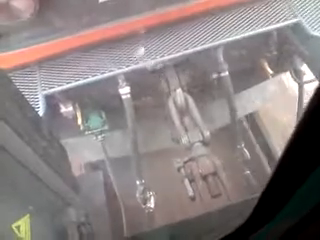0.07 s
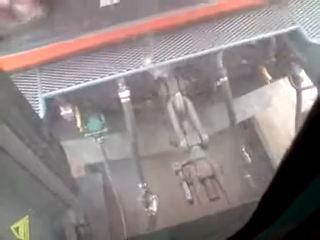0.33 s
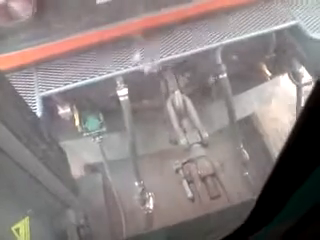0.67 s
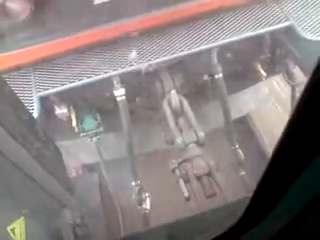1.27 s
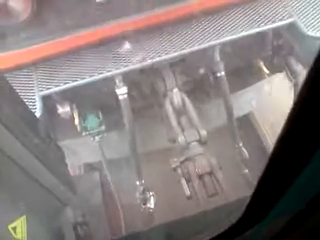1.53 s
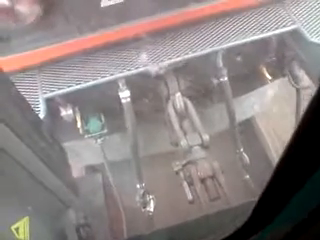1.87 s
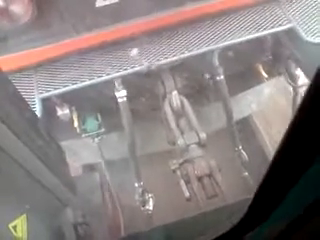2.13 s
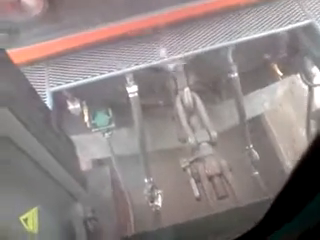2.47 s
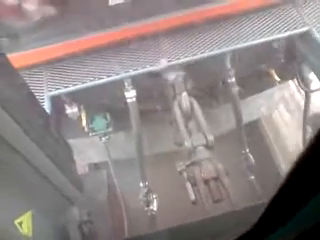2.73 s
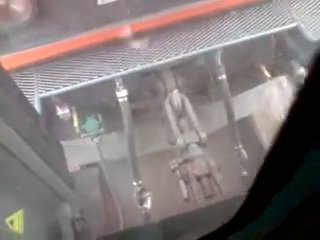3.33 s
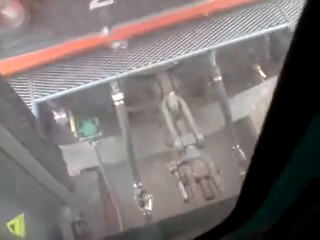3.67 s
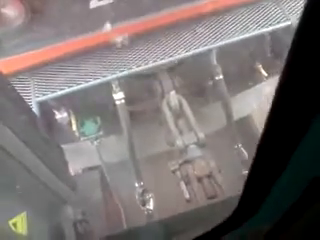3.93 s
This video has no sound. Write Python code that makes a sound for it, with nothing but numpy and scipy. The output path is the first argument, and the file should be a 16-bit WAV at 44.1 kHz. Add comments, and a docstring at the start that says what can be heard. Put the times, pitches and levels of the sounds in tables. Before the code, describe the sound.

Steady low rumble of a rolling train, with booming knocks and clinking steel fittings.

```python
"""A rolling train, heard inside the end of a carriage, above the coupling.
Wheels shake the hollow body and roar on the rails; panels drone and moan. Wheel and coupling
knocks make the body boom and loose steel fittings clatter. The coupling scrapes now and then.
The recorder is dull and clips the heaviest booms."""
import sys
import numpy as np
from scipy import signal
from scipy.fft import rfft, irfft
from scipy.io import wavfile
from scipy.ndimage import uniform_filter1d

SR = 44100
rng = np.random.default_rng(int(sys.argv[2]) if len(sys.argv) > 2 else 0)


def wrap_up_sound(samples):
    """Save the sound to the file named by the first command line argument, as 16-bit audio."""
    columns = np.atleast_2d(samples).T
    # keep every value between -1 and 1, then stretch to whole-number steps
    tamed = np.clip(columns, -1, 1)
    steps = np.round(tamed * 32767).astype(np.int16)
    wavfile.write(sys.argv[1], SR, steps)


N = 176400

# rolling noise: t/s, floor rumble/dB, body boom/dB, panel drone/dB, rail roar/dB
ROLLING_LEVELS = [(0, -27, -17.5, -23.5, -25), (0.379, -29, -16.5, -21, -24.5), (.6, -26, -17, -20, -23.5),
                  (.8, -31, -18, -21.5, -22.5), (0.998, -29, -16, -18.5, -23), (1.201, -28, -16, -29, -25),
                  (1.5, -26.5, -18, -20, -22.5), (1.65, -28, -18.5, -19.5, -26.5),
                  (1.88, -32.5, -22, -24.5, -24), (2.049, -27, -19, -22, -20),
                  (2.3, -33, -17.5, -27, -19.5), (2.5, -35.5, -22, -20.5, -24.5),
                  (3.0, -31.5, -19.5, -29, -21), (3.419, -29.5, -23, -24.5, -23),
                  (3.6, -24.5, -22.5, -21, -24.5), (4, -29, -18.5, -30, -19)]
# floor rumble: f/Hz, relative level/dB
RUMBLE_SPECTRUM = [(15, -29.5), (30, -20), (50, -8.5), (70, -4), (100, -.5), (140, 0), (190, 6),
                   (260, -7.5), (500, -34.5)]
# rail roar: f/Hz, relative level/dB
ROAR_SPECTRUM = [(150, -32.5), (330, 1.5), (450, -8), (560, -1), (750, -3.5), (980, -5), (1150, -11.5),
                 (1400, -22), (2500, -37)]
# rail hiss: f/Hz, relative level/dB
HISS_SPECTRUM = [(600, -18), (1200, -5), (1600, -0.5), (2300, 4), (2700, -0.5), (3000, -1.5), (3600, 0),
                 (4500, -8.5)]
# steel contacts: f/Hz, relative level/dB
CLATTER_SPECTRUM = [(200, -5), (500, 12), (900, 9.5), (1400, 0.5), (2300, 0.5), (3000, 2.5), (3600, -2),
                    (4500, -8.5)]
# carriage body resonances: f/Hz, width/Hz, relative level/dB
BODY_MODES = [(186, 26, -11), (229, 10, -3), (277.4, 22, 1), (304.4, 5.3, -6), (327, 7.3, -11),
              (400, 26, -15.5), (255.3, 7.3, -7.5)]
# wall and floor panel resonances: f/Hz, width/Hz, relative level/dB
PANEL_MODES = [(412, 46, -2.5), (500.8, 9.8, -1.5), (537, 23, -3), (565.5, 8.4, -4.5), (609, 31, 0),
               (687.4, 23, -2.5), (780, 14, -8), (880, 46, -11)]
# steel fitting resonances: f/Hz, width/Hz, relative level/dB
STEEL_MODES = [(915, 180, 6), (1514, 110, -5), (1880, 430, -6), (2290, 680, -6), (2620, 30, -2),
               (3430, 250, -4)]
# wheel and coupling knocks: t/s, thud f/Hz, push/dB, clatter/dB, clatter decay/s
KNOCK_EVENTS = [(0.129, 271.3, -19.5, -25, 0.032), (0.149, 263, -8.5, -37, .04),
                (.492, 273.3, -14.5, -25.5, 0.11), (0.516, 249, -8.5, -46.5, 0.033),
                (.652, 227, -10.5, -28, 0.045), (0.709, 224.4, -11.5, -52, .03), (.84, 273, -7, -37, 0.027),
                (.885, 276, -7.5, -28, 0.051), (.92, 267, -12, -46.5, .03), (1.061, 227, -10, -33.5, 0.035),
                (1.135, 257.6, -14, -52, .03), (1.244, 300.3, -4.5, -27.5, 0.028),
                (1.691, 279.5, -6, -24, 0.056), (2.03, 281.7, -16, -20, .055), (2.07, 280, -15, -30, .04),
                (2.582, 284.8, -14, -38, 0.052), (2.824, 274, -34, -29, 0.047),
                (2.917, 280.8, -15, -50.5, 0.048), (3.003, 273, -24, -27, 0.044),
                (3.17, 280, -4.5, -23, 0.058), (3.503, 226, -12, -22, .05), (3.535, 225, -13, -27, .04),
                (3.667, 221, -27, -26.5, .07), (3.779, 246.6, -11, -38, .04),
                (3.804, 285, -18.5, -28, 0.04), (3.924, 302.4, -20.5, -25, 0.046)]
# clear clinks of fittings: t/s, f/Hz, peak level/dB
CLEAR_CLINKS = [(.148, 2640, -34), (1.728, 2630, -31), (2.222, 2610, -20), (2.262, 3600, -23),
                (2.735, 2440, -31.5), (3.548, 3426, -24.5), (3.698, 2190, -30), (3.88, 3480, -29.5)]
# panel moans: centre t/s, sigma/s, f/Hz, level/dB
PANEL_MOANS = [(0.562, 0.041, 562, -21), (0.824, 0.019, 607, -15), (1.009, .03, 780, -22),
               (1.5, 0.045, 497, -22.5), (2.038, 0.033, 667, -18), (2.287, 0.019, 905, -21.5)]
# steel rubbing in the coupling: centre t/s, sigma/s, level/dB
COUPLING_SCRAPES = [(2.26, 0.047, -24.5), (3.563, 0.039, -41.5), (3.712, 0.036, -36.5), (3.903, 0.053, -31)]

ROAR_EDGES_HZ = [120, 450, 650, 880, 1150, 3000]
SWELL_RATE_HZ = 9


def undb(db):
    """Decibels to gain."""
    return 10 ** (np.asarray(db) / 20)


def unit(x):
    """Scale to rms 1."""
    return x / np.sqrt(np.mean(x ** 2) + 1e-18)


def noise():
    """White noise."""
    return rng.standard_normal(N)


def flutter(depth_db, rate_hz):
    """Random gain: held steps, smoothed twice; depth is rms."""
    hold = int(SR / rate_hz)
    steps = noise()[np.arange(N) // hold]
    smooth = uniform_filter1d(uniform_filter1d(steps, hold), hold)
    return undb(depth_db * unit(smooth))


def colour(x, spectrum):
    """Shape x by a spectrum table; rms 1."""
    hz, db = np.array(spectrum).T
    f_hz = np.arange(N // 2 + 1) * SR / N
    gain = undb(np.interp(np.log(f_hz + 1), np.log(hz), db))
    return unit(irfft(rfft(x) * gain, N))


def resonate(x, modes):
    """Drive parallel resonances with x; rms 1."""
    s = 1j * np.arange(N // 2 + 1) * SR / N
    response = sum(undb(db) * s * width_hz / (s * s + s * width_hz + hz * hz)
                   for hz, width_hz, db in modes)
    return unit(irfft(rfft(x) * response, N))


def ringing(modes, low_hz, high_hz):
    """Resonances shaken by band-limited noise."""
    band = signal.butter(2, [low_hz, high_hz], "bandpass", fs=SR, output="sos")
    return resonate(signal.sosfilt(band, noise()), modes)


def blow(age_s, rise_s, decay_s):
    """Envelope: linear rise, exponential decay."""
    return np.clip(age_s / rise_s, 0, 1) * np.exp(-np.maximum(age_s - rise_s, 0) / decay_s)


def swell(t, centre_s, sigma_s):
    """Gaussian envelope."""
    return np.exp(-((t - centre_s) / sigma_s) ** 2 / 2)


def rail_roar():
    """Wheels roar on the rails; each band waxes and wanes on its own."""
    spectrum = rfft(colour(noise(), ROAR_SPECTRUM))
    f_hz = np.arange(N // 2 + 1) * SR / N
    bands = [irfft(spectrum * (f_hz >= low_hz) * (f_hz < high_hz), N)
             for low_hz, high_hz in zip(ROAR_EDGES_HZ, ROAR_EDGES_HZ[1:])]
    return unit(sum(band * flutter(1.6, SWELL_RATE_HZ) for band in bands))


def panel_drone():
    """Each panel drones at its own pitch and swells on its own."""
    drone = np.zeros(N)
    for hz, width_hz, db in PANEL_MODES:
        gain = undb(db) * flutter(2, SWELL_RATE_HZ)
        drone += gain * ringing([(hz, width_hz, 0)], low_hz=hz * 0.74, high_hz=hz * 1.256)
    return unit(drone)


def rolling(t):
    """Wheels shake floor, hollow body and panels; the rails roar and hiss."""
    times_s, *levels_db = np.array(ROLLING_LEVELS).T
    rumble_gain, boom_gain, drone_gain, roar_gain = (undb(np.interp(t, times_s, db)) for db in levels_db)
    rumble = rumble_gain * colour(noise(), RUMBLE_SPECTRUM)
    boom = boom_gain * ringing(BODY_MODES, low_hz=171, high_hz=460)
    roar = roar_gain * rail_roar()
    drone = drone_gain * panel_drone()
    hiss = undb(-35) * colour(noise(), HISS_SPECTRUM)
    return ((rumble + boom) * flutter(depth_db=1.08, rate_hz=16)
            + (roar + drone) * flutter(depth_db=1.46, rate_hz=20)
            + hiss * flutter(depth_db=2.07, rate_hz=28))


def loose_steel(ring_db=-5.5):
    """Dense small contacts between steel parts; some ring."""
    contacts = noise() * flutter(depth_db=1.5, rate_hz=260)
    return colour(contacts, CLATTER_SPECTRUM) + undb(ring_db) * resonate(contacts, STEEL_MODES)


def chatter(t, jolts_per_s=21, level_db=-43):
    """Small random jolts keep the fittings chattering."""
    jolts = (rng.random(N) < jolts_per_s / SR) * rng.uniform(0.62, 1, N)
    envelope = signal.fftconvolve(jolts, blow(t, rise_s=0.0025, decay_s=0.024))[:N]
    return undb(level_db) * unit(envelope) * loose_steel()


def clinks(t, faint_per_s=30, faint_hz=(1294, 3330), faint_db=(-40, -37)):
    """Single fittings ring briefly: a few clearly, many faintly at random."""
    faint = [(rng.uniform(0, N / SR), rng.uniform(*faint_hz), rng.uniform(*faint_db))
             for _ in range(int(faint_per_s * N / SR))]
    age_s = t[:SR // 10]
    envelope = blow(age_s, rise_s=0.007, decay_s=0.014)
    out = np.zeros(N)
    for start_s, hz, db in CLEAR_CLINKS + faint:
        ring = undb(db) * envelope * np.sin(2 * np.pi * hz * age_s)
        i = int(start_s * SR)
        out[i:i + len(ring)] += ring[:N - i]
    return out


def knocks(t, thud_db=2.5, shudder_db=-6, thump_db=-17):
    """Each knock swings one low body mode, shakes the others and rattles the fittings."""
    thud, shake, rattle = np.zeros((3, N))
    for start_s, hz, push_db, clatter_db, clatter_decay_s in KNOCK_EVENTS:
        age_s = t - start_s
        push = undb(push_db) * blow(age_s, rise_s=0.013, decay_s=0.04)
        thud += push * np.sin(2 * np.pi * hz * age_s)
        shake += push
        rattle += undb(clatter_db) * blow(age_s, rise_s=0.015, decay_s=clatter_decay_s)
    shudder = undb(shudder_db) * ringing(BODY_MODES, low_hz=139, high_hz=397)
    thump = undb(thump_db) * colour(noise(), RUMBLE_SPECTRUM)
    return undb(thud_db) * thud + shake * (shudder + thump) + rattle * loose_steel()


def moans(t):
    """One panel at a time swells above the rest and dies back."""
    return sum(undb(db) * swell(t, centre_s, sigma_s) * np.sin(2 * np.pi * hz * t)
               for centre_s, sigma_s, hz, db in PANEL_MOANS)


def scrapes(t):
    """The coupling rubs; its steel sings briefly."""
    envelope = sum(undb(db) * swell(t, centre_s, sigma_s) for centre_s, sigma_s, db in COUPLING_SCRAPES)
    return envelope * ringing(STEEL_MODES, low_hz=700, high_hz=4500)


def scene():
    """All carriage sounds, mono."""
    t = np.arange(N) / SR
    mix = rolling(t) + knocks(t) + moans(t) + chatter(t) + clinks(t) + scrapes(t)
    return mix[None]


def record(dry, rolloff_hz=3762, cut_hz=4450, top_hz=15900, clip_level=0.715, hardness=24):
    """Recorder: treble roll-off, steep cut, peak clipping, final low-pass."""
    dull = signal.sosfilt(signal.butter(14, rolloff_hz, fs=SR, output="sos"), dry)
    dull = signal.sosfilt(signal.ellip(8, 0.3, 70, cut_hz, fs=SR, output="sos"), dull)
    clipped = dull / (0.5 + np.abs(dull / clip_level) ** hardness) ** (1 / hardness)
    return signal.sosfilt(signal.ellip(8, 0.2, 70, top_hz, fs=SR, output="sos"), clipped)


dry = scene()
out = record(dry)
wrap_up_sound(out)
```